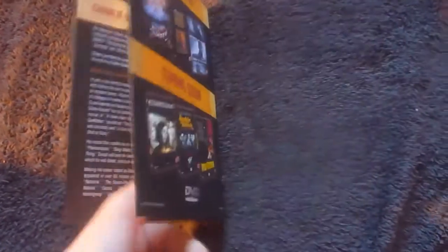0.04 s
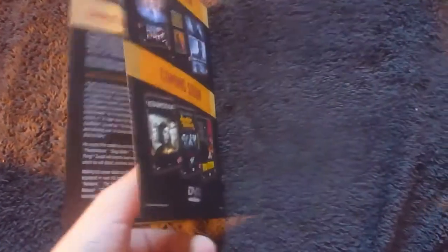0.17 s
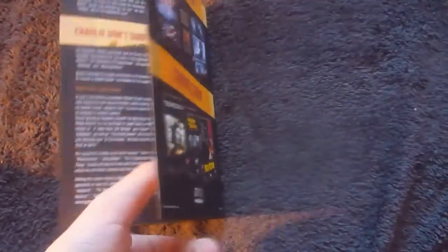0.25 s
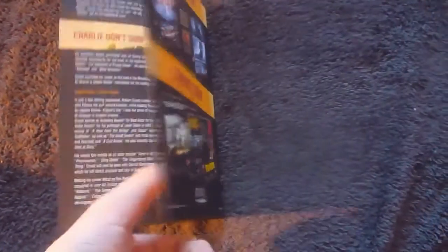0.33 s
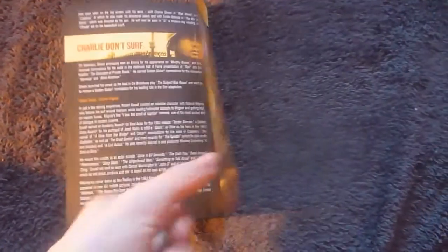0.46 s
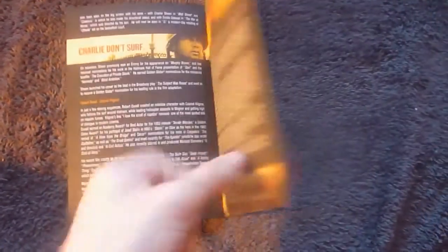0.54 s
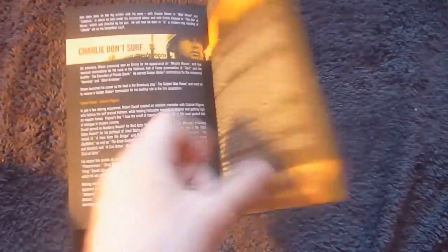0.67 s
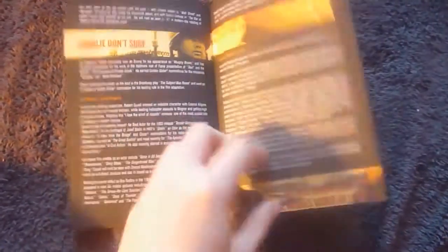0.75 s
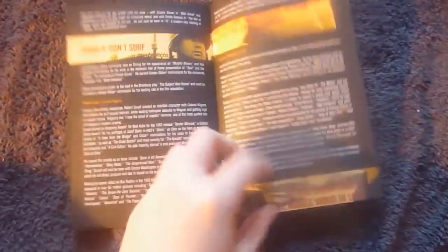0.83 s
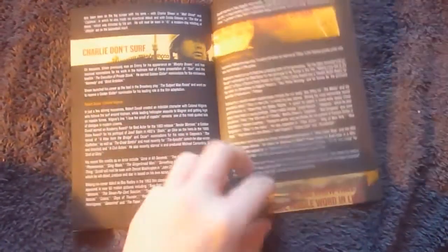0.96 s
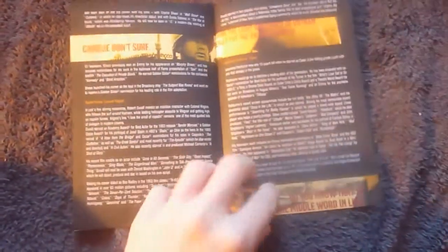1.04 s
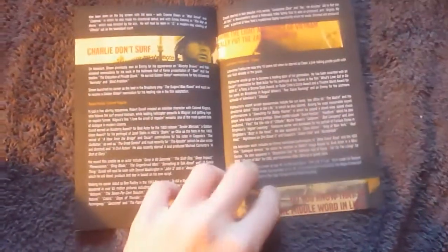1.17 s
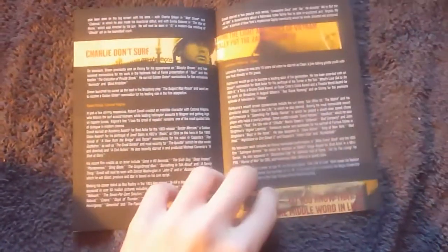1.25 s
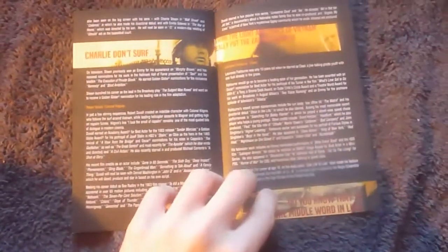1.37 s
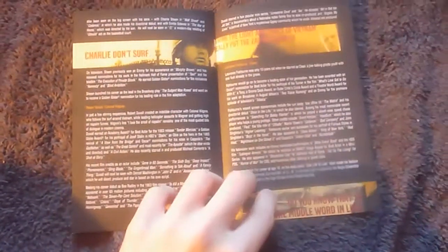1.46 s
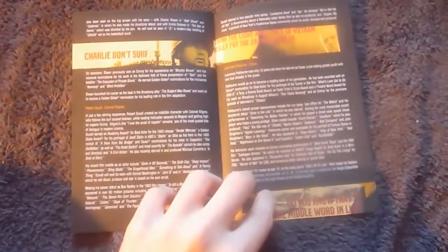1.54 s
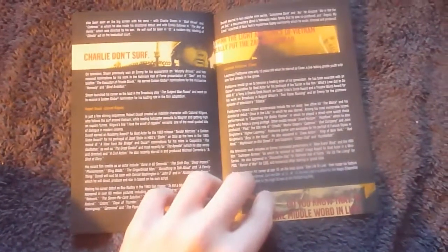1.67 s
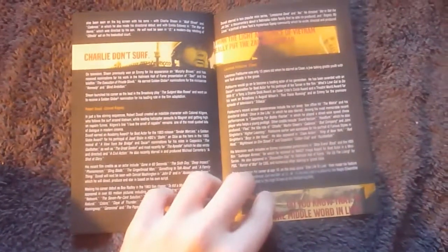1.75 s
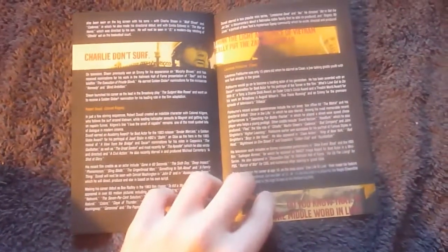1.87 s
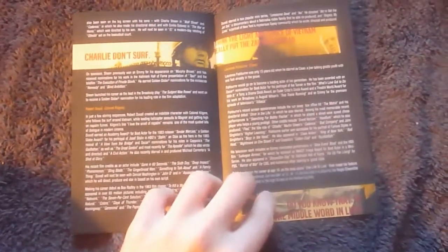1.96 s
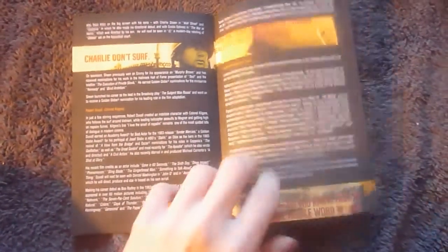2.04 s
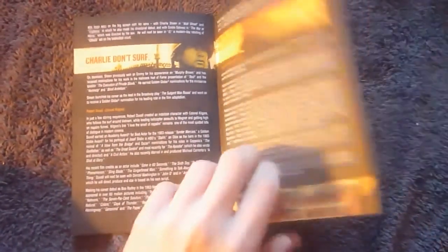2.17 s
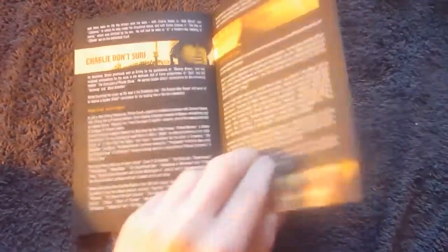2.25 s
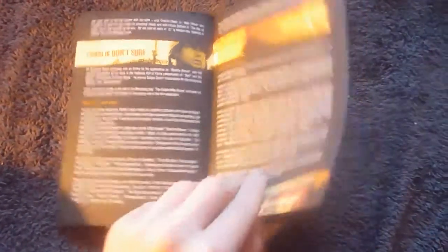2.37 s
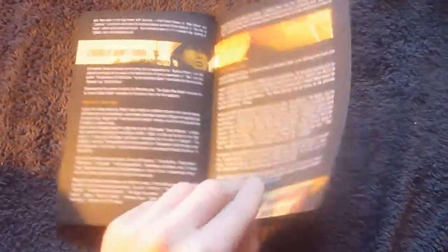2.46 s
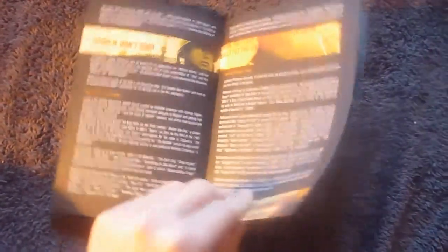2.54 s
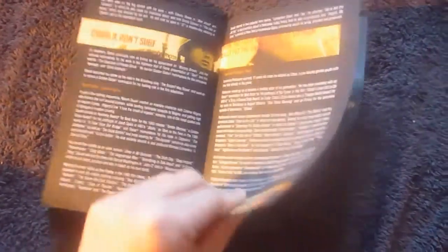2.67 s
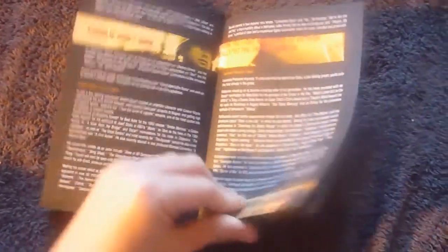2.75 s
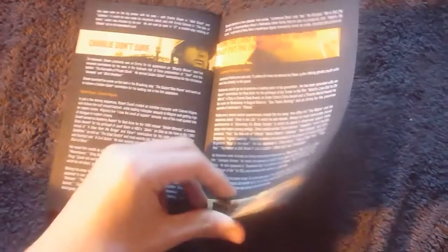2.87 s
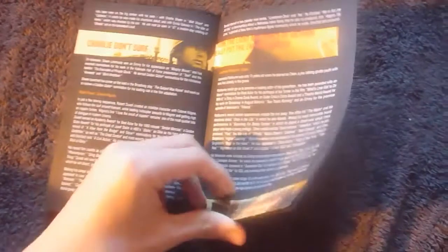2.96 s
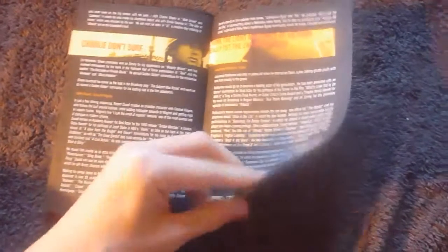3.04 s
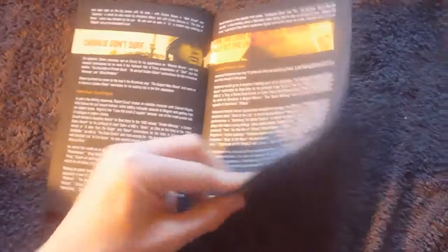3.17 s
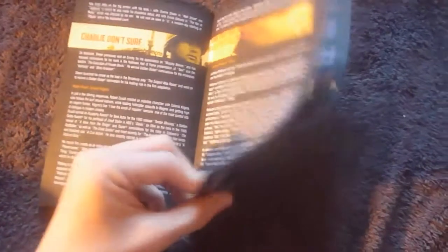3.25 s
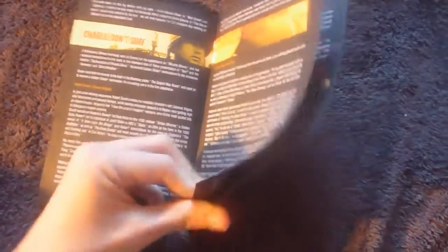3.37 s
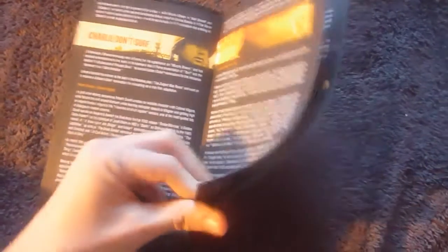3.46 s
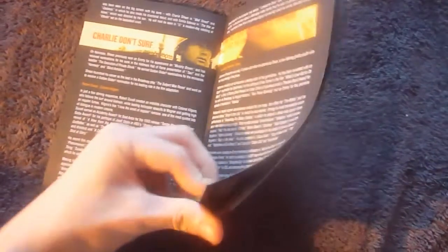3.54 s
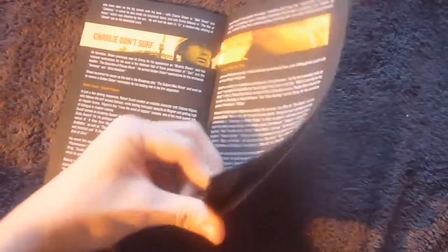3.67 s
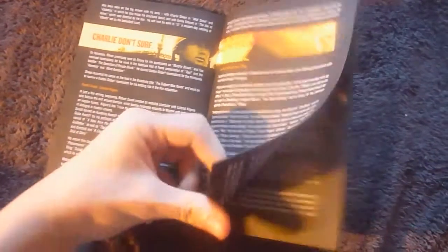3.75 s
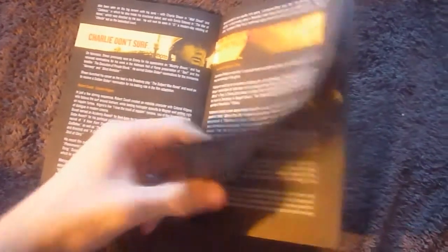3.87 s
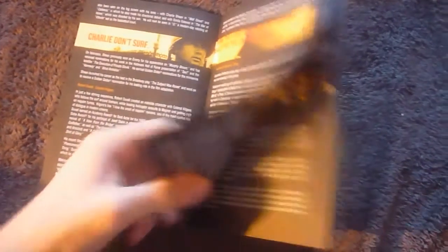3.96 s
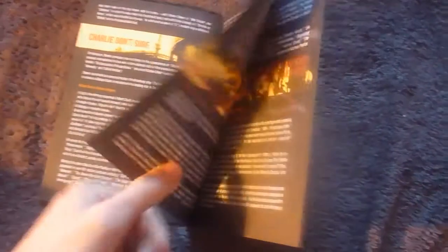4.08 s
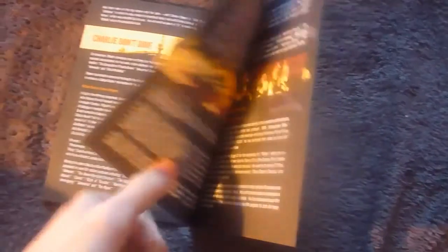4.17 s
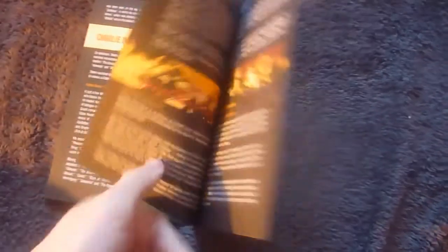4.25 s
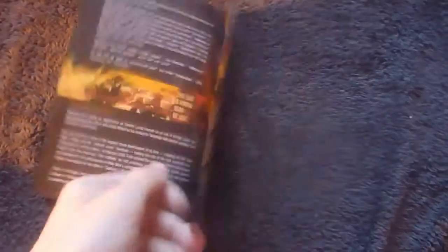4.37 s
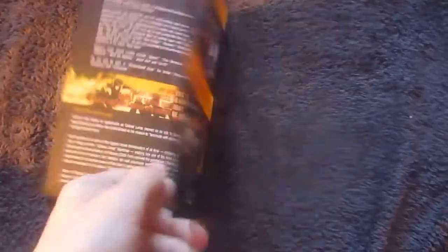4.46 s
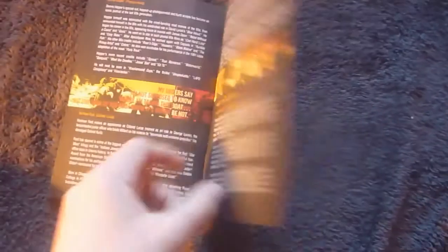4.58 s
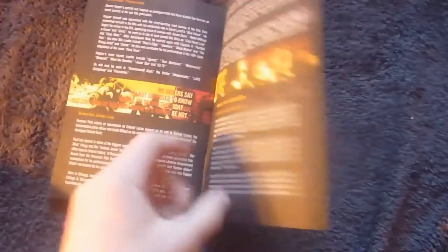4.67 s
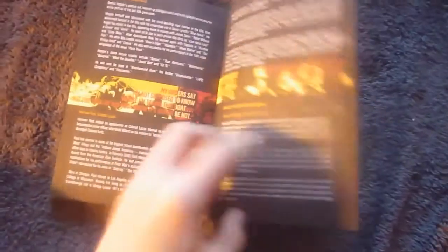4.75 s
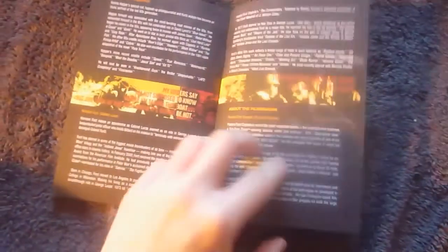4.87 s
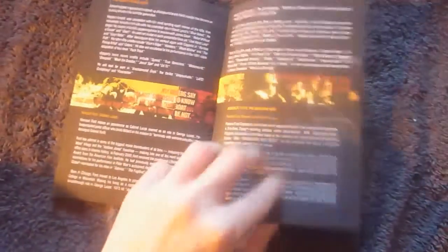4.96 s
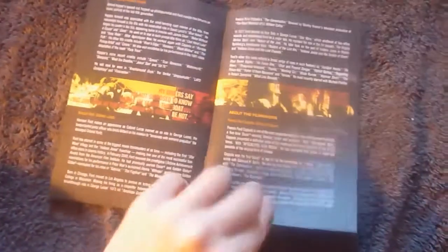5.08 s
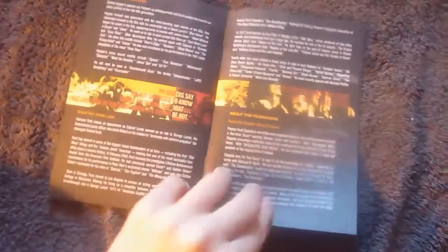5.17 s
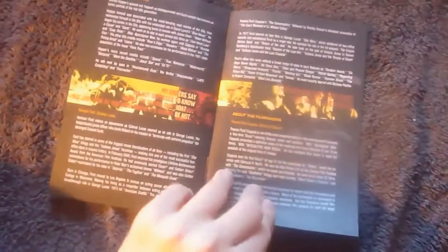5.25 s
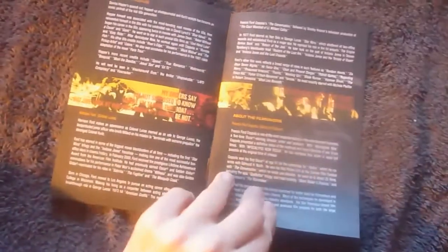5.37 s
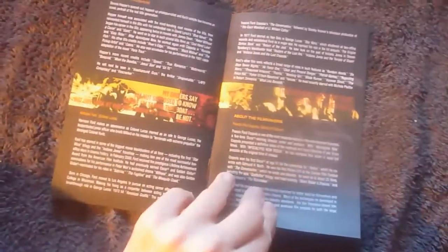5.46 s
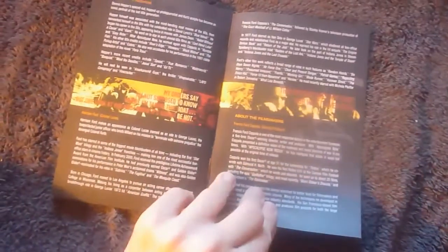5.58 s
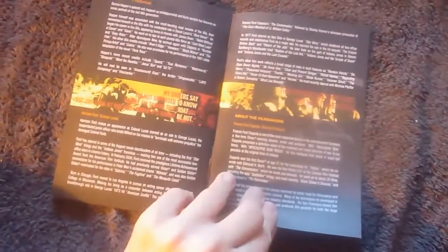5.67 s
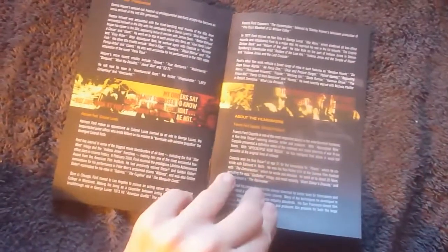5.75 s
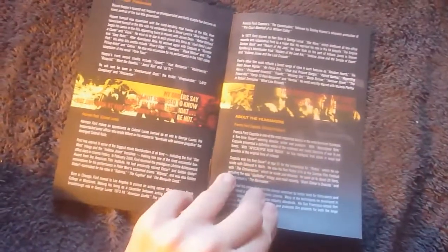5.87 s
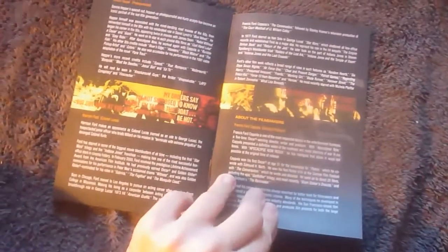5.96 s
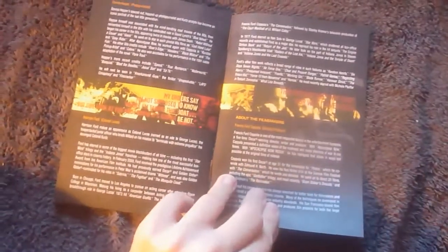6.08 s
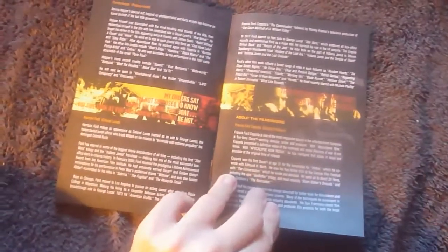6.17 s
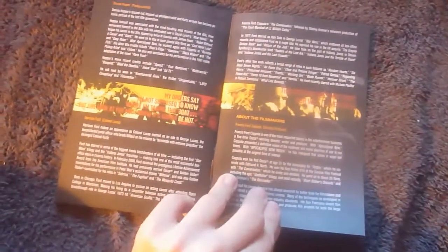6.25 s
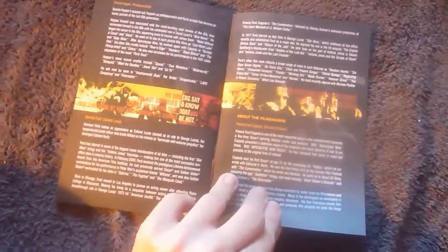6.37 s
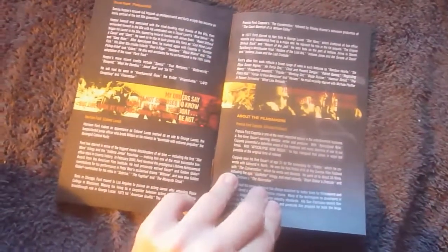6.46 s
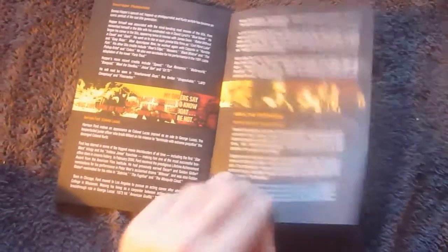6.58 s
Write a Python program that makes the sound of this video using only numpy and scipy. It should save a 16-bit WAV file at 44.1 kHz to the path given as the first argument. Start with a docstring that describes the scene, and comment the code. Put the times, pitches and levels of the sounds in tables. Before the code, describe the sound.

Fingers brush a glossy booklet on a soft blanket, with faint rubs and small pops. A firm paper snap leads into a short, scratchy falling swish. After a calmer moment another sheet slides, then flips with a sharp clap and puff of air, and settles in dull flutters. Close microphone, small furnished room, steady low hiss and faint hum.

```python
"""Turning pages

A hand turns two glossy pages of a small booklet on a blanket in a quiet room: fingers brush and smooth the paper.
Sheets buckle with dull snaps (damped pressure pulses), settle on air (shrinking rebounds) and slide with a falling
swish (friction through sinking resonances). One flips with a sharp clap (a run of snaps) and a puff (a slow pressure
swing). Dense echoes follow the paper sounds; soft hum (wavering sines) and microphone hiss (coloured noise) last."""
import sys
import numpy as np
from scipy import signal
from scipy.fft import rfft, irfft
from scipy.io import wavfile

SR = 44100
rng = np.random.default_rng(int(sys.argv[2]) if len(sys.argv) > 2 else 0)


def wav_record(signal):
    """Record a signal, one row per channel, as 16-bit PCM in the file named by sys.argv[1]."""
    frames = np.transpose(np.atleast_2d(signal))
    bounded = np.clip(frames, -1, 1)
    # unit amplitude maps onto the largest positive 16-bit level
    quanta = np.round(bounded * 32767).astype(np.int16)
    wavfile.write(sys.argv[1], SR, quanta)


N = 291942
TIME = np.arange(N) / SR


def amp(db):
    """Decibel law: 20 dB is a factor of ten in amplitude."""
    return 10 ** (np.asarray(db) / 20)


def evened(x):
    """Power normalisation: scales a signal to rms 1."""
    return x / np.sqrt(np.mean(x ** 2) + 1e-20)


def read(points, hz):
    """Logarithmic frequency scale: interpolates a table along it."""
    f, value = np.transpose(points)
    return np.interp(np.log(hz + 1), np.log(f + 1), value)


def add(mix, s, sound):
    """Superposition: sums a sound into the mix from a time in seconds."""
    part = mix[max(round(s * SR), 0):][:len(sound)]
    part += sound[:len(part)]


def coloured(x, points, tilt_db=0, size=4096):
    """Minimum-phase filtering: a folded cepstrum gives a causal filter, tilted by some dB an octave."""
    hz = np.fft.rfftfreq(size, 1 / SR)
    tilt = tilt_db * np.log2(np.maximum(hz, 500) / 2000)
    cepstrum = irfft(np.log(amp(read(points, hz) + tilt)))
    cepstrum[1:size // 2] *= 2
    cepstrum[size // 2 + 1:] = 0
    impulse = irfft(np.exp(rfft(cepstrum)))
    return signal.fftconvolve(x, impulse)[:len(x)]


def resonate(x, hz, width):
    """Damped resonance of gain 1: a one-pole low-pass in a frame turning at a fixed or moving pitch."""
    turn = np.exp(2j * np.pi * np.cumsum(hz * np.ones(len(x))) / SR)
    r = np.exp(-np.pi * width / SR)
    in_frame = signal.lfilter([1 - r], [1, -r], x / turn + 1e-18)
    return 2 * (turn * in_frame).real


def wander(t, per_s):
    """Slow random modulation: straight lines join normal draws of unit spread."""
    knots = rng.standard_normal(4096)
    return np.interp((t - t[0]) * per_s, np.arange(len(knots)), knots)


def friction(t, slips_per_s, spread_db, clump_db, smooth_share):
    """Stick-slip friction: uneven random slips over smooth fibre hiss, swelling together in clumps."""
    size = amp(spread_db * np.minimum(rng.exponential(1, len(t)), 4))
    happens = rng.random(len(t)) < slips_per_s / SR
    slips = size * rng.choice([-1, 1], len(t)) * happens
    fibres = smooth_share * rng.standard_normal(len(t))
    return (evened(slips) + fibres) * amp(clump_db * wander(t, per_s=220))


# spectrum of the hiss, before it is set to HISS_DB: (frequency [Hz], relative level [dB per Hz])
HISS_SPECTRUM = [(18, -34), (30, -15.5), (62, -5.5), (92, -7.5), (140, -0.5), (205, -3), (290, -4),
                 (450, -7.5), (900, -13.5), (2130, -21), (5580, -29.5), (7400, -33.5), (8000, -45),
                 (8700, -34), (15500, -36.5)]
HISS_DB = -53  # rms
# steady hum of the room: (frequency [Hz], rms level [dB])
HUM_TONES = [(61, -71.5), (121, -70), (142, -64), (242, -64)]


def background(waver=0.35, drift=0.99):
    """Stationary noise and modulated tones: even hiss with a hum wavering in strength and phase."""
    hiss = amp(HISS_DB) * evened(coloured(rng.standard_normal(N), HISS_SPECTRUM))
    hum = np.zeros(N)
    for hz, db in HUM_TONES:
        strength = 1 + waver * wander(TIME, per_s=2.59)
        phase = 2 * np.pi * hz * TIME + drift * wander(TIME, per_s=7)
        hum += amp(db) * evened(strength * np.sin(phase))
    return hiss + hum


# skin or paper brushes a page:
# (time of strongest contact [s], length [s], level at that contact [dB], mean ring of the free corner [Hz])
BRUSH_STROKES = [ (0.13, 0.19, -60.5, 2600), (0.805, 0.082, -55, 3300), (0.885, .06, -51.3, 1700),
                 (0.98, .2, -56.5, 3480), (1.15, .065, -48.3, 3300), (2.066, .036, -47.5, 3000),
                 (2.73, .062, -48, 2300), (2.793, .037, -44.5, 5300), (2.846, .065, -55, 4900),
                 (3.029, .126, -52.5, 2200), (3.419, 0.09, -48.5, 3560), (3.60, .22, -57.5, 4900),
                 (3.713, .032, -49.5, 4000), (3.961, .144, -52, 4270), (4.099, 0.071, -53, 4500),
                 (4.344, .038, -44, 2400), (4.826, .07, -51, 4000), (4.882, 0.074, -46.5, 1900),
                 (5.04, 0.17, -51.5, 4600), (5.294, 0.029, -48.5, 3160), (6.61, 0.091, -55, 2800), ]
# spectrum of a stroke, before the tilt: (frequency [Hz], relative level [dB per Hz])
STROKE_SPECTRUM = [(200, -28), (600, -6), (1200, 2), (2200, -2), (3500, -3), (5000, -4), (6600, -8),
                   (8000, -14), (10500, -8.5), (13000, -10.5), (16000, -14.5)]
# the page rings while pressed by a hand: (frequency [Hz], width [Hz], gain before the ring share [dB])
HELD_PAGE_MODES = [(1225, 150, -4.5), (2750, 90, -9), (3300, 180, -3)]
RUB_RISE_SHARE, RUB_ROUNDNESS = .41, 1.6  # part of a stroke spent pressing down; 1 = pointed swell, 2 = round
# brightness in dB an octave at a 3 kHz ring, and its growth per octave of ring: a stiffer span is brighter
RUB_TILT_DB, RUB_TILT_PER_OCTAVE = -1.23, 1.45


def rub(s, length, db, hz, ring=0.89, width_hz=520, free_db=0, waver=0.068):
    """Friction-driven resonance: a stroke swells and fades, ringing the held page and its free corner."""
    rise, fall = length * RUB_RISE_SHARE, length * (1 - RUB_RISE_SHARE)
    tilt_db = RUB_TILT_DB + RUB_TILT_PER_OCTAVE * np.log2(hz / 3000)
    t = np.arange(max(s - 2 * rise, 0), s + 2 * length, 1 / SR)
    contact = np.exp(-abs((t - s) / np.where(t < s, rise, fall)) ** RUB_ROUNDNESS)
    slips = friction(t, slips_per_s=1200, spread_db=3.0, clump_db=2.0, smooth_share=1.0)
    page = sum(amp(mode_db) * resonate(slips, f, width) for f, width, mode_db in HELD_PAGE_MODES)
    # the corner's pitch shifts as the fingers move
    corner_hz = hz * (1 + waver * wander(t, per_s=35.5))
    corner = amp(free_db) * resonate(slips, corner_hz, width_hz)
    stroke = evened(coloured(slips + ring * (page + corner), STROKE_SPECTRUM, tilt_db))
    return t[0], amp(db) * contact * stroke


CATCH_DB, CATCH_HZ, CATCH_DB_PER_S = 7, 1500, -70  # level above the stroke, pitch, change with stroke length


def catch(length, db):
    """Stick-slip release: a stroke catches once with a tick, weaker the slower it is."""
    tick_db = db + CATCH_DB + CATCH_DB_PER_S * length
    return buckle(tick_db, CATCH_HZ, flutter_db=-2, swell_ms=SWELL_MS)


# spectrum of the edge crack: (frequency [Hz], relative level [dB per Hz])
CRACK_SPECTRUM = [(300, 1), (1400, -1), (3000, 3.5), (4200, 4), (6800, -3.5), (8000, -10), (10500, -2),
                  (12000, -1), (14300, 5), (16000, -4)]
# the free sheet rings: (frequency [Hz], width [Hz], relative level [dB])
FREE_SHEET_MODES = [(330, 160, 2), (670, 160, -1), (807, 140, -1.5), (1156, 130, 0.5), (1460, 180, -1),
                    (1880, 230, -0.5), (2110, 300, 2.5), (2460, 90, 6), (2870, 150, 4), (3230, 140, 2),
                    (3780, 300, 7.5)]


def snap(db, hz, swell_ms, crack_db, flutter_db, flutter_s=0.011, crack_s=0.0023, crackle_db=-15,
         kick_s=0.00031, leak_hz=420):
    """Impulsive radiation and modal ringing: a few cycles of pressure, an edge crack and a dying flutter."""
    t = np.arange(SR // 5) / SR
    u = t / (swell_ms / 1000)
    swing = np.sin(2 * np.pi * hz * t)
    # air slips round the edge of the sheet, so it radiates little bass
    leak = signal.butter(2, leak_hz, "high", fs=SR)
    pop = signal.lfilter(*leak, u * np.exp(1 - u) * swing)
    crack_shape = np.exp(-t / crack_s) + amp(crackle_db) * np.exp(-t / flutter_s)
    crack_noise = evened(coloured(rng.standard_normal(len(t)), CRACK_SPECTRUM))
    crack = amp(crack_db) * crack_noise * crack_shape
    # the first kick sends bending waves to and fro across the page, ringing its modes
    waves = rng.choice([-1, 1], len(t)) * np.exp(-t / flutter_s) * (1 - np.exp(-t / 0.0027))
    kick = t * np.exp(-t / kick_s) * swing
    waves = signal.fftconvolve(kick, waves)[:len(t)]
    flutter = sum(amp(mode_db) * resonate(waves, f, width) for f, width, mode_db in FREE_SHEET_MODES)
    flutter *= amp(flutter_db) * np.linalg.norm(pop) / np.linalg.norm(flutter)
    return amp(db) * (pop + crack + flutter)


# the sheet buckles into a new bend; the rows at 2.7097 s and 4.537 s are a finger's catch and a sharp crack as
# a sheet lands: (time [s], level [dB], pitch [Hz], flutter energy beside the pop [dB])
BUCKLES = [ (0.388, -35, 503, 6), (0.782, -35.5, 1020, 1), (2.3387, -14.3, 980, 0.3),
           (2.5038, -26, 850, -1), (2.5070, -23, 900, -15), (2.6236, -25, 2350, -8),
           (2.7097, -23.5, 820, -9), (2.7494, -34, 865, 1), (2.802, -32, 1160, -2), (3.0854, -36, 1450, -7),
           (3.3314, -30, 850, -1), (3.709, -29.5, 870, -1), (4.3745, -19.5, 440, 2),
           (4.537, -36.5, 2500, 0), (5.4985, -44.5, 2200, -8), (6.5182, -40, 1800, -3), ]
SWELL_MS = 0.45  # time the pressure envelope of a buckle takes to reach its peak
# the edge crack beside a 1 kHz pop of -30 dB: sharper for a small bend, and growing more slowly than the pop
CRACK_DB, CRACK_DB_PER_OCTAVE, CRACK_LAG = -17, 5, 0.3


def buckle(db, hz, flutter_db, swell_ms, flutter_s=0.012):
    """Snap-through buckling: the strength of the edge crack follows from pitch and level."""
    crack_db = CRACK_DB + CRACK_DB_PER_OCTAVE * np.log2(hz / 1000) - CRACK_LAG * (db + 30)
    return snap(db, hz, swell_ms, crack_db, flutter_db, flutter_s)


# the sheet settles on a cushion of air and rebounds:
# (time of edge touch [s], level of first contact [dB], pitch [Hz], its swell time [ms], loss each rebound [dB])
SETTLINGS = [(0.8078, -29.5, 620, .5, 4), (4.5399, -23, 930, 0.3, 3), (4.6487, -25, 770, 1.35, 2.7)]
EDGE_LEAD_S, EDGE_TOUCH_DB, EDGE_TOUCH_HZ = .004, -11, 1030  # lead and level beside the first contact; pitch
REBOUND_S, REBOUND_SHRINK = .0172, .85  # the first gap, and each gap as a share of the one before


def landing(db, hz, swell_ms, loss_db, count=4, crack_db=-25, flutter_db=-1.5, stiffen=0.7):
    """Inelastic rebound: after the edge touches, dull contacts come ever sooner, shorter and weaker."""
    out, s = np.zeros(SR // 2), EDGE_LEAD_S
    add(out, 0, buckle(db + EDGE_TOUCH_DB, EDGE_TOUCH_HZ, flutter_db=4.5, swell_ms=SWELL_MS))
    for k in range(count):
        contact = snap(db - k * loss_db, hz, swell_ms * stiffen ** k, crack_db, flutter_db)
        add(out, s, contact)
        s += REBOUND_S * REBOUND_SHRINK ** k
    return out


# a page edge drags over the next page, one curve a turn: (time [s], level before DRAG_DB is added [dB])
DRAG_CURVES = [
    [(2.515, -50), (2.521, -53), (2.553, -33), (2.585, -41.5), (2.627, -32.5), (2.639, -42), (2.649, -35),
     (2.685, -46), (2.7, -52)],
    [(3.162, -55), (3.196, -31), (3.264, -35.5), (3.302, -44), (3.31, -40.5), (3.37, -54.5)],
]
DRAG_DB = .9  # added to every drag level
# when half of each sheet has come free, one value a turn: (time [s])
PEEL_TIMES = [2.565, 3.205]
# spectrum of the scrape: (frequency [Hz], relative level [dB per Hz])
SCRAPE_SPECTRUM = [(150, -14), (400, -6.5), (900, -1.5), (1250, 2.5), (1600, -3.5), (2500, 1), (4000, 4.5),
                   (5200, -2), (6600, -6), (8000, -11), (10500, -7), (13500, -4), (16000, -18)]
# the lower resonance sinks, apart from its waver, as the free span grows
HELD_HZ, FREE_HZ, PEEL_TIME_S = 4100, 2120, 0.015


def drag(rows, peel_s, width_hz=400, ring_db=1.7, upper_ratio=1.62, upper_db=-6, waver=0.064):
    """Friction on a lengthening span: two resonances fall unevenly as more of the sheet comes free."""
    s, level_db = np.transpose(rows)
    t = np.arange(s[0], s[-1], 1 / SR)
    slips = friction(t, slips_per_s=3200, spread_db=0.5, clump_db=2.0, smooth_share=0.66)
    held = 1 / (1 + np.exp((t - peel_s) / PEEL_TIME_S))
    pitch = (FREE_HZ + (HELD_HZ - FREE_HZ) * held) * (1 + waver * wander(t, per_s=70.4))

    def ringing(hz):
        """Cascaded resonance: two passes steepen the skirts."""
        return evened(resonate(resonate(slips, hz, 2 * width_hz), hz, 2 * width_hz))

    lower, upper = ringing(pitch), ringing(pitch * upper_ratio)
    free = np.clip((4200 - pitch) / 1200, .3, 1)  # a short, stiff span hardly rings
    scrape = friction(t, slips_per_s=2000, spread_db=2.5, clump_db=2.0, smooth_share=1.0)
    ring = free * (amp(ring_db) * lower + amp(upper_db) * free * upper)
    swish = evened(coloured(scrape, SCRAPE_SPECTRUM)) + ring
    return s[0], amp(DRAG_DB + np.interp(t, s, level_db)) * evened(swish)


FLIP_S, PUFF_DELAY_S = 4.381, .002  # the second page whips over with a clap and then a puff of air


def flip(count=3, gap_s=.0013, first_hz=3750, fall_ratio=.55, db=-9.7, swell_ms=.24, lengthen=1.8,
         crack_db=-15.5, dulling_db=2.5, flutter_db=-11.5, flutter_s=.03, crackle_db=-21):
    """Whip action: a kink runs from edge to belly, each crack lower, longer and duller than the last."""
    out = np.zeros(SR // 2)
    for k in range(count):
        hz, swell = first_hz * fall_ratio ** k, swell_ms * lengthen ** k
        edge_db = crack_db - k * dulling_db
        add(out, k * gap_s, snap(db, hz, swell, edge_db, flutter_db, flutter_s, crackle_db=crackle_db))
    return out


def puff(db=-28, rise_s=0.00076, swing_hz=2.5, fade_s=0.078):
    """Air displacement: the flipping page pushes one slow, decaying swing of pressure at the microphone."""
    t = np.arange(SR // 2) / SR
    swing = np.cos(2 * np.pi * swing_hz * t + 0.59)
    return amp(db) * (1 - np.exp(-t / rise_s)) * np.exp(-t / fade_s) * swing


# reverberation of the room: (frequency [Hz], time to fall 60 dB [s])
DECAY_TIMES = [(250, 0.35), (700, 0.36), (1800, 0.37), (4600, 0.21), (14000, 0.34)]


def room(x, gap_s=.004):
    """Diffuse reverberation: dense random echoes of a small furnished room decay at a rate set by frequency."""
    count = SR // 2
    arrives = (rng.random(count) < 4000 / SR) * (TIME[:count] > gap_s)
    taps = rng.choice([-1., 1.], count) * arrives
    hz, t, z = signal.stft(taps, SR, nperseg=256)
    decay = amp(-60 * t / read(DECAY_TIMES, hz)[:, None])
    tail = signal.istft(z * decay, SR)[1]
    return signal.fftconvolve(x, tail / np.linalg.norm(tail))[:N]


def scene():
    """Linear superposition: paper sounds, their echo, the quiet room and the puff add up."""
    paper = np.zeros(N)
    for s, db, hz, flutter_db in BUCKLES:
        add(paper, s, buckle(db, hz, flutter_db, SWELL_MS))
    for s, *fall in SETTLINGS:
        add(paper, s, landing(*fall))
    for rows, peel_s in zip(DRAG_CURVES, PEEL_TIMES):
        add(paper, *drag(rows, peel_s))
    for s, length, db, hz in BRUSH_STROKES:
        add(paper, *rub(s, length, db, hz))
        add(paper, s, catch(length, db))
    add(paper, FLIP_S, flip())
    air = paper + amp(-12.0) * room(paper) + background()
    add(air, FLIP_S + PUFF_DELAY_S, puff())
    return air[None]


EDGE_HZ, OFFSET = 15900, .0077  # low-pass corner; steady offset as a share of full scale


def record(dry):
    """Band limitation: a linear-phase low-pass removes the highest treble, then a small steady offset is added."""
    low_pass = signal.firwin(511, EDGE_HZ, window=("kaiser", 9), fs=SR)
    return signal.oaconvolve(dry, low_pass[None], "same") + OFFSET


dry = scene()
out = record(dry)
wav_record(out)
```